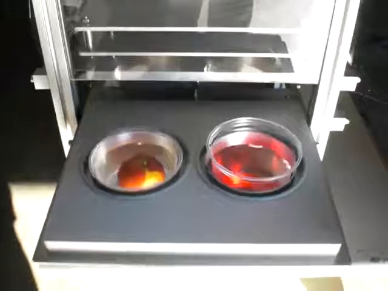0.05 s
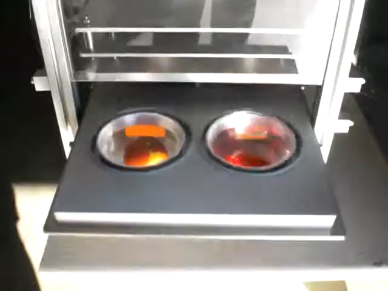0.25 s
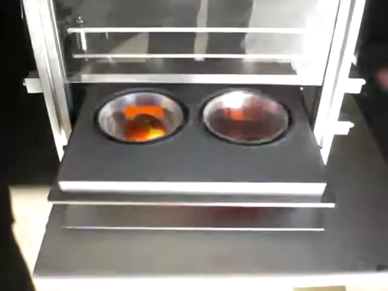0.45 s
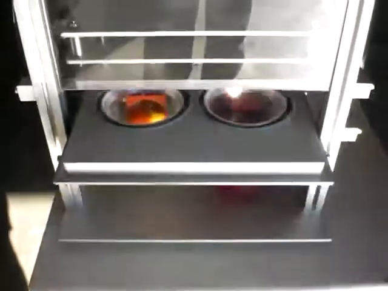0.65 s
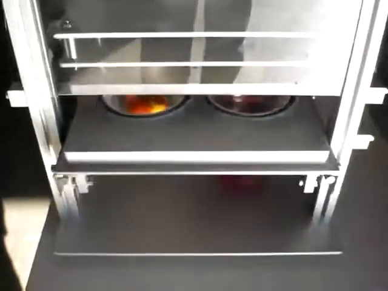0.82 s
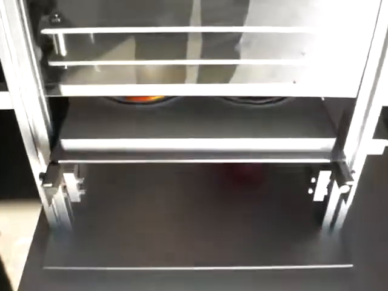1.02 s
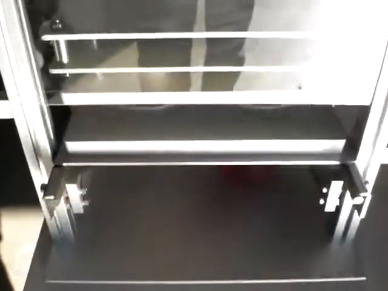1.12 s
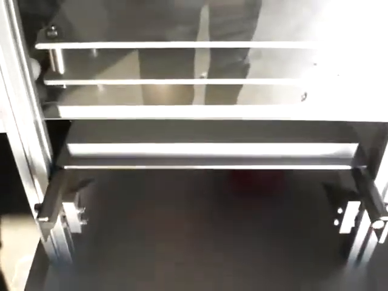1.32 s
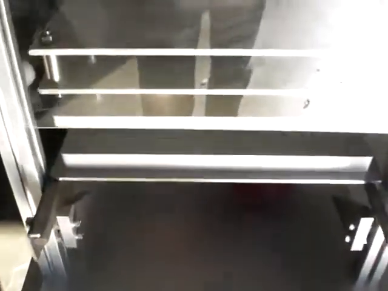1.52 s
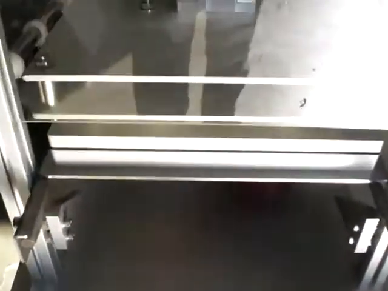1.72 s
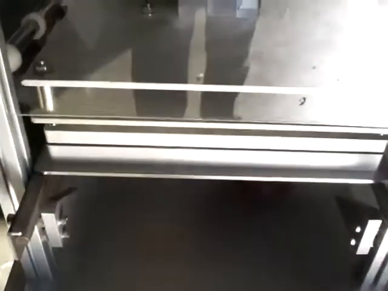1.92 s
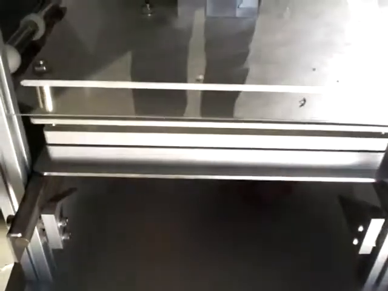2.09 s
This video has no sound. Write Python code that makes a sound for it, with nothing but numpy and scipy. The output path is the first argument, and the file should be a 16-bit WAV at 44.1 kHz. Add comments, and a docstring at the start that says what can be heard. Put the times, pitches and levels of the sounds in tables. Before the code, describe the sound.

An air-powered cup sealing machine cycles close up in a small workshop. Its metal tray rattles and slides with a thin whistle, a valve clacks, the head thumps down and air hisses out, over a low rumble.

```python
"""A small workshop, one microphone just in front of the tray of a pneumatic cup sealer.
The loaded tray jolts and rattles, then rubs along its guides with a thin whistle and a faint air leak.
The valve ticks and clacks; the sealing head shudders down and lands with a thump. Exhaust air hisses
in two stages, a bright jet and a softer bleed, while the press knocks and groans on the cups.
The machine rumbles throughout."""
import sys
import numpy as np
from scipy import signal
from scipy.fft import rfft, irfft, next_fast_len
from scipy.io import wavfile

SR = 44100
rng = np.random.default_rng(int(sys.argv[2]) if len(sys.argv) > 2 else 0)


def put_to_file(sound):
    """Save the sound as 16-bit audio at rate SR, in the file named by the first command-line argument."""
    columns = np.atleast_2d(sound).T  # one column per channel
    safe = np.clip(columns, -1, 1)
    whole_steps = np.round(safe * 32767)
    wavfile.write(sys.argv[1], SR, whole_steps.astype(np.int16))


N = 94815
TIME = np.arange(N) / SR

# Loudness of the steady sounds as the cycle runs. Each row: time in seconds, level in dB.
RUMBLE_LEVELS = [(.195, -33.5), (.45, -38.5), (.49, -44.5), (.7, -43.5), (.9, -41.5), (1.3, -44),
                 (1.65, -44.5), (2.15, -45)]
SLIDE_LEVELS = [(.195, -37), (.25, -30.5), (.34, -45.5), (.41, -37), (.45, -32.5), (.49, -36), (.56, -39),
                (.63, -41.5), (.82, -43), (.97, -50.5), (1.15, -49.5), (1.22, -51), (1.39, -54),
                (1.55, -67)]
LEAK_LEVELS = [(.195, -77), (.69, -58), (.715, -47), (.8, -48.5), (.95, -58), (1.35, -55), (1.5, -52),
               (2.15, -66)]
RUB_WHISTLE_LEVELS = [(.76, -56), (.89, -49.5), (.98, -53), (1.04, -46.5), (1.1, -50), (1.15, -47.5),
                      (1.23, -51.5), (1.29, -46), (1.38, -48), (1.45, -100)]
JUDDER_LEVELS = [(1.385, -52), (1.405, -26.5), (1.43, -27.5), (1.465, -36), (1.54, -38.5), (1.57, -35),
                 (1.62, -53), (1.7, -80)]
EXHAUST_LEVELS = [(1.553, -57), (1.56, -18.5), (1.58, -21), (1.615, -22.5), (1.725, -22), (1.755, -27),
                  (1.79, -31.5), (1.86, -32), (1.882, -27.5), (1.905, -33.5), (1.972, -29), (1.995, -33),
                  (2.06, -44.5), (2.1, -59.5), (2.15, -80)]

# Parts striking each other. Each row: start in seconds, level in dB, seconds to fall 60 dB.
TRAY_JOLTS = [(.2595, -35, 0.054), (.2635, -15, 0.078), (.2678, -11.5, 0.046), (.2737, -6.5, 0.025),
              (.2875, -26, 0.035), (.2905, -11.5, 0.029), (.296, -18, 0.047), (.2998, -13.5, .04),
              (.3137, -20.5, .05), (.3195, -25.5, 0.033), (.3445, -29.5, .06)]
GUIDE_BUMPS = [(.812, -43, 0.073), (.954, -36.5, .06), (1.084, -46, 0.097), (1.174, -38, 0.057)]
CARRIAGE_SCUFFS = [(1.115, -42, 0.14), (1.149, -41, 0.065), (1.496, -39, 0.092)]
VALVE_TICKS = [(1.3436, -25.5, 0.049), (1.3638, -30, 0.088), (1.5425, -26, 0.077)]
VALVE_CLACKS = [(1.3932, -15.5, 0.073), (1.3945, -17, 0.033)]
LANDING_CRACKS = [(1.5482, -16, 0.098), (1.5555, -13, 0.045)]
PRESS_KNOCKS = [(1.736, -32.5, 0.23), (1.75, -28, 0.16), (1.875, -37.5, 0.091), (1.925, -44.5, 0.17),
                (2.04, -41.5, 0.27)]

# Tone colour of each source from in front of the tray. Each row: frequency in Hz, relative level in dB.
RUMBLE_SPECTRUM = [(25, -47), (50, -24), (80, -4.5), (120, -2), (170, 2), (230, -5), (330, -12.5),
                   (600, -18), (1200, -30.5), (4000, -31), (12000, -55)]
SLIDE_SPECTRUM = [(40, -31), (100, -15), (300, -2.5), (600, 4), (900, -5.5), (1100, -3), (1750, -10),
                  (2100, -7), (2550, -4), (2720, -13), (3100, -12), (3700, -16), (5000, -20), (7000, -23.5),
                  (8500, -29.5), (12000, -28)]
BLEED_SPECTRUM = [(200, -17), (1100, -5), (1700, -13), (2200, -7.5), (2750, -2), (3200, -6.5), (3700, -1.5),
                  (5200, -0.5), (6300, -3.5), (7100, -0.5), (8500, -4), (9400, -3), (12000, -4.5)]
JOLT_SPECTRUM = [(40, -51), (100, -31), (170, -19), (330, -7.5), (520, 1), (740, 2), (880, -14),
                 (1150, -1.5), (1600, -9), (2200, -4.5), (2550, -12), (3400, -11.5), (5500, -19.5),
                 (7100, -22.5), (8400, -27.5), (12000, -28)]
BUMP_SPECTRUM = [(100, -10), (300, 5), (560, 2), (780, -13), (1020, 6.5), (1300, -17), (3000, -17),
                 (12000, -43)]
SCUFF_SPECTRUM = [(500, -9), (1500, -2), (2500, 5), (3200, -6), (3900, -7), (6500, -11), (8500, -22),
                  (12000, -13)]
TICK_SPECTRUM = [(1000, -12), (3000, -4), (3900, 0), (4600, -7.5), (6200, 0), (6700, -5), (7400, 2),
                 (8300, -4.5), (12000, 1.5)]
CLACK_SPECTRUM = [(300, -25), (1700, -20), (2350, -6), (2950, 8.5), (3500, -1.5), (4150, -15), (4600, -3.5),
                  (5400, -2), (5850, -2.5), (6150, 3), (6550, -12), (7300, -8.5), (8900, 1), (10100, -11.5),
                  (10700, -3), (12000, -4.5)]
JUDDER_SPECTRUM = [(30, -36), (50, -7), (85, 4.5), (200, 0.5), (320, -9), (560, -1), (780, -14),
                   (1150, -11.5), (1600, -20.5), (3000, -16.5), (6000, -35), (12000, -48)]
LANDING_SPECTRUM = [(50, 3), (170, 5), (300, 7.5), (450, 0.5), (850, -8), (1100, 1.5), (1600, 0.5),
                    (2150, 8), (3500, 2.5), (5200, -5), (7100, 2), (8600, -5.5), (11000, 6.5),
                    (12000, -2.5)]
JET_SPECTRUM = [(200, -26), (1100, -9), (1700, -16), (2100, -7.5), (2400, -9.5), (2750, -2.5), (3100, -10),
                (3600, -2), (4150, -5.5), (4550, 0.5), (6000, 1), (6600, 1), (7050, 0), (7500, 0),
                (9400, 2.5), (12000, -1.5)]
KNOCK_SPECTRUM = [(60, -5), (160, 2.5), (330, -2), (560, 0.5), (800, -1.5), (1100, -2.5), (1500, -13),
                  (2200, -7), (4000, -12), (12000, -47)]

# Tones of rubbing parts. Each row: start and end in seconds, first and last pitch in Hz,
# width in Hz, level in dB.
GUIDE_SQUEAKS = [(.213, .226, 3920, 3940, 220, -32), (.238, .248, 3950, 3900, 220, -45),
                 (.437, .47, 3200, 3000, 130, -40), (.44, .475, 2050, 2036, 248, -44.5),
                 (.43, .48, 4900, 4960, 90, -49.5), (.48, .515, 5280, 5430, 89, -55.5),
                 (.535, .575, 6550, 6730, 400, -55.5), (.46, .585, 2500, 2500, 200, -47),
                 (.6, .87, 2507, 2380, 219, -56.5), (1.01, 1.24, 3850, 3850, 110, -62.5),
                 (1.3885, 1.40, 3000, 3000, 350, -41)]
PRESS_GROANS = [(1.775, 1.835, 535, 568, 34, -41), (1.77, 1.818, 175.5, 171, 40, -33),
                (1.87, 1.93, 168, 163, 26, -43), (1.58, 1.86, 1140, 1110, 42, -49),
                (1.875, 1.965, 1220, 1100, 114, -45.5)]
# Modes of struck metal. Each row: frequency in Hz, relative level in dB, seconds to fall 60 dB.
TRAY_RESONANCES = [(345, -11, .2), (431, -12, .2), (498, -2, .25), (536, -4, .2), (624, -7, .3),
                   (685, -12, .25), (720, -4, .24), (996, -10, .2), (1069, -10, .22), (1223, -10, .3),
                   (1384, -13, .25), (1557, -14, .3), (1907, -12, .3), (2236, -12, .25)]
VALVE_RESONANCES = [(2800, -22, .05), (3001, -10, 0.072), (3180, -18, .15), (6160, -18, 0.064),
                    (8938, -26, .06)]
# The head breaking loose and landing. Each row: start in seconds, level in dB, pitch in Hz,
# seconds to fall 60 dB.
HEAD_THUMPS = [(1.4114, -17.5, 89.3, 0.12), (1.4228, -28, 84.5, 0.13), (1.5541, -6.5, 159, 0.022)]
# The frame ringing under the moving head. Each row: frequency in Hz, level in dB.
FRAME_RESONANCES = [(161, -33.5), (253, -46), (417, -47), (535, -56), (1140, -47)]
# Whistles of the exhaust port. Each row: pitch in Hz, width in Hz, relative level in dB.
PORT_TONES = [(4560, 110, -7), (7010, 110, -4), (8060, 70, -6), (9230, 110, -2), (9790, 120, -4),
              (10640, 130, 0), (11690, 110, 0)]


def from_db(db):
    """Decibels to gain."""
    return 10 ** (np.asarray(db) / 20)


def rms_one(x):
    """Scale to unit level."""
    return x / np.sqrt(np.mean(x ** 2) + 1e-20)


def level(curve):
    """Gain over time from (s, dB) points, silent before the first."""
    times, db = np.transpose(curve)
    return from_db(np.interp(TIME, times, db, left=-120))


def gate(start, end, edge_s):
    """Smooth on and off."""
    return (1 + np.tanh((TIME - start) / edge_s)) * (1 - np.tanh((TIME - end) / edge_s)) / 4


def noise():
    """White noise."""
    return rng.standard_normal(N)


def colour(x, spectrum):
    """Causal filter with the given (Hz, dB) shape; white noise keeps its level."""
    hz, db = np.transpose(spectrum)
    size = 2 * next_fast_len(N)
    grid_hz = np.maximum(np.arange(size // 2 + 1) * SR / size, 1)
    gain = rms_one(from_db(np.interp(np.log(grid_hz), np.log(hz), db)))
    cepstrum = irfft(np.log(gain))
    # Minimum phase: nothing sounds ahead of a hit.
    cepstrum[1:size // 2] *= 2
    cepstrum[size // 2 + 1:] = 0
    return irfft(rfft(x, size) * np.exp(rfft(cepstrum)))[:N]


def slow_noise(cutoff_hz):
    """Low-passed noise."""
    return signal.sosfilt(signal.butter(2, cutoff_hz, fs=SR, output="sos"), noise())


def flutter(rate_hz, depth_db):
    """A gain that wavers at random."""
    return from_db(depth_db * rms_one(slow_noise(rate_hz)))


def whistle(hz, width_hz):
    """A narrow, unsteady tone; its pitch may glide."""
    phase = 2 * np.pi * np.cumsum(hz * np.ones(N)) / SR
    return rms_one(slow_noise(width_hz / 2) * np.cos(phase) + slow_noise(width_hz / 2) * np.sin(phase))


def decay(start, t60):
    """Sudden start, exponential fall of 60 dB in t60 seconds."""
    return (TIME >= start) * from_db(-60 * np.clip((TIME - start) / t60, 0, 2))


def bursts(hits):
    """Dense, quickly dying vibration after each contact."""
    power = sum((from_db(db) * decay(start, t60)) ** 2 for start, db, t60 in hits)
    return noise() * np.sqrt(power)


def tails(hits, tail_db, t60):
    """The fainter ring of the housing after the same contacts."""
    return bursts([(start, db + tail_db, t60) for start, db, _ in hits])


def ring(hits, modes, spread_db):
    """Each contact strikes each mode, its strength scattered by spread_db; the ringing carries no deep bass."""
    strengths = from_db(rng.standard_normal((len(hits), len(modes))) * spread_db)
    starts, hit_db, _ = np.transpose(hits)
    ringing = np.zeros(N)
    for (hz, mode_db, t60), strength in zip(modes, strengths.T):
        clicks = np.full(N, 1e-18)
        clicks[(starts * SR).astype(int)] = from_db(hit_db + mode_db) * strength
        radius = np.exp(-np.log(1000) / (t60 * SR))
        angle = 2 * np.pi * hz / SR
        ringing += signal.lfilter([0, np.sin(angle)], [1, -2 * radius * np.cos(angle), radius ** 2], clicks)
    return signal.sosfilt(signal.butter(2, 150, "high", fs=SR, output="sos"), ringing)


def friction_tones(rows):
    """Rubbing parts sing unsteadily in narrow, gliding resonances."""
    tones = np.zeros(N)
    for start, end, from_hz, to_hz, width_hz, db in rows:
        pitch_hz = np.interp(TIME, [start, end], [from_hz, to_hz])
        tones += from_db(db) * gate(start, end, edge_s=0.0055) * whistle(pitch_hz, width_hz)
    return tones


def machine_rumble():
    """The running machine lays a low rumble under the whole cycle."""
    return colour(noise(), RUMBLE_SPECTRUM) * level(RUMBLE_LEVELS)


def tray_slide():
    """The tray rubs along its guides, squeaking and then whistling thinly."""
    rubbing = noise() * level(SLIDE_LEVELS) * flutter(rate_hz=130, depth_db=1.5)
    singing = friction_tones(GUIDE_SQUEAKS) + level(RUB_WHISTLE_LEVELS) * whistle(hz=2090, width_hz=130)
    return colour(rubbing, SLIDE_SPECTRUM) + singing * flutter(rate_hz=82, depth_db=2)


def air_leak():
    """Air leaks with a faint hiss from the tray's travel onward."""
    return colour(noise(), BLEED_SPECTRUM) * level(LEAK_LEVELS)


def tray_rattle():
    """The tray jolts and rings, then bumps over its guides while the carriage scuffs."""
    jolts = colour(bursts(TRAY_JOLTS) + tails(TRAY_JOLTS, tail_db=-28.5, t60=0.6), JOLT_SPECTRUM)
    ringing = from_db(-19.5) * ring(TRAY_JOLTS, TRAY_RESONANCES, spread_db=2.5)
    bumps = colour(bursts(GUIDE_BUMPS), BUMP_SPECTRUM)
    scuffs = colour(bursts(CARRIAGE_SCUFFS), SCUFF_SPECTRUM)
    return jolts + ringing + bumps + scuffs


def valve():
    """The valve gives light ticks and one hard clack that sets its metal ringing."""
    ticks = colour(bursts(VALVE_TICKS), TICK_SPECTRUM)
    clack = colour(bursts(VALVE_CLACKS) + tails(VALVE_CLACKS, tail_db=-12, t60=0.14), CLACK_SPECTRUM)
    return ticks + clack + ring(VALVE_CLACKS, VALVE_RESONANCES, spread_db=0)


def sealing_head():
    """The head breaks loose, judders down the ringing frame and lands with a thump and metal cracks."""
    attack_s = 0.0014
    thumps = np.zeros(N)
    for start, db, hz, t60 in HEAD_THUMPS:
        age = np.maximum(TIME - start, 0)
        thumps += from_db(db) * decay(start, t60) * np.tanh(age / attack_s) * np.sin(2 * np.pi * hz * age)
    judder = colour(noise() * level(JUDDER_LEVELS), JUDDER_SPECTRUM)
    frame = np.zeros(N)
    for hz, db in FRAME_RESONANCES:
        tone = np.sqrt(2) * np.sin(2 * np.pi * hz * TIME)
        frame += from_db(db) * flutter(rate_hz=53, depth_db=4) * tone
    cracks = colour(bursts(LANDING_CRACKS), LANDING_SPECTRUM)
    return thumps + judder + frame * gate(start=1.415, end=1.56, edge_s=0.02) + cracks


def exhaust():
    """Air leaves the port as a bright whistling jet, then gives way to a softer bleed."""
    port_db, bleed_from_s, fade_s = -13.5, 1.76, 0.0078
    whistles = sum(from_db(port_db + db) * whistle(hz, width_hz) for hz, width_hz, db in PORT_TONES)
    jet = colour(noise(), JET_SPECTRUM) + whistles
    bleed = colour(noise(), BLEED_SPECTRUM)
    bleed_share = .5 + .5 * np.tanh((TIME - bleed_from_s) / fade_s)
    hiss = np.sqrt(1 - bleed_share) * jet + np.sqrt(bleed_share) * bleed
    return hiss * level(EXHAUST_LEVELS) * flutter(rate_hz=120, depth_db=0.57)


def press():
    """The press groans under load and knocks as it settles on the cups."""
    return friction_tones(PRESS_GROANS) + colour(bursts(PRESS_KNOCKS), KNOCK_SPECTRUM)


def room(x):
    """The small workshop returns a short, diffuse reverberation."""
    response = noise() * decay(start=0.0054, t60=0.13)
    response /= np.sqrt(np.sum(response ** 2))
    return from_db(-18.5) * signal.fftconvolve(x, response)[:N]


def scene():
    """The machine in mono from just in front of the tray; only the moving parts carry room sound."""
    parts = tray_slide() + tray_rattle() + valve() + sealing_head() + press()
    return (machine_rumble() + air_leak() + parts + room(parts) + exhaust())[None]


def record(dry):
    """Sound starts abruptly; the microphone has a narrow notch, thin deep bass and a steep top cut."""
    start_s = .195
    notch_hz, low_cut_hz, top_cut_hz = 7860, 48, 12050
    x = dry * (TIME >= start_s)
    x = signal.lfilter(*signal.iirnotch(notch_hz, Q=30, fs=SR), x)
    x = signal.sosfilt(signal.butter(2, low_cut_hz, "high", fs=SR, output="sos"), x)
    return signal.sosfilt(signal.ellip(12, .2, 80, top_cut_hz, fs=SR, output="sos"), x)


dry = scene()
out = record(dry)
put_to_file(out)
```